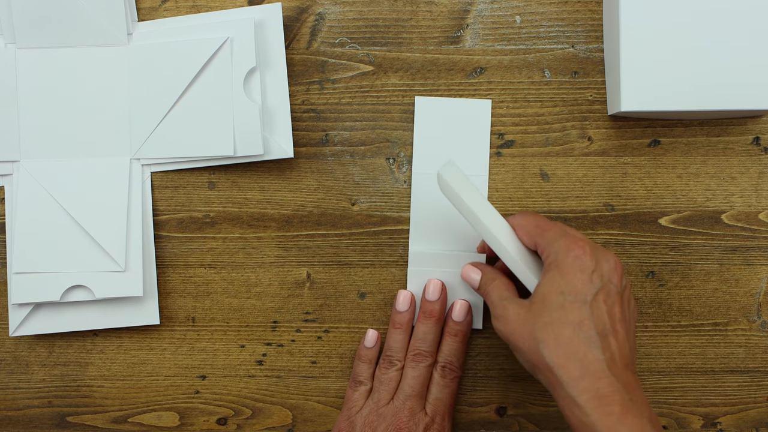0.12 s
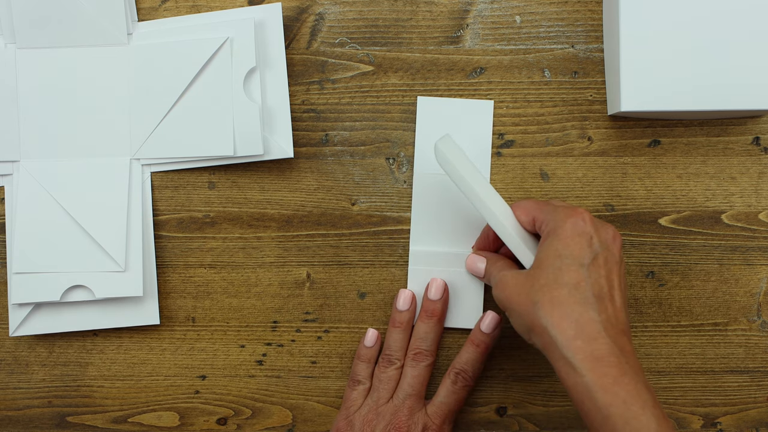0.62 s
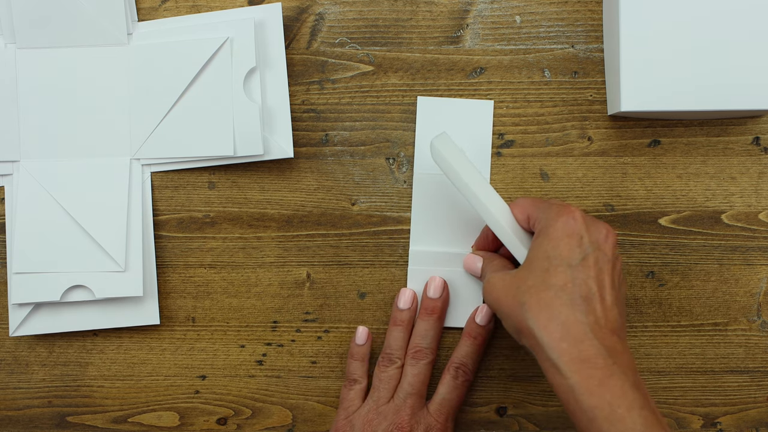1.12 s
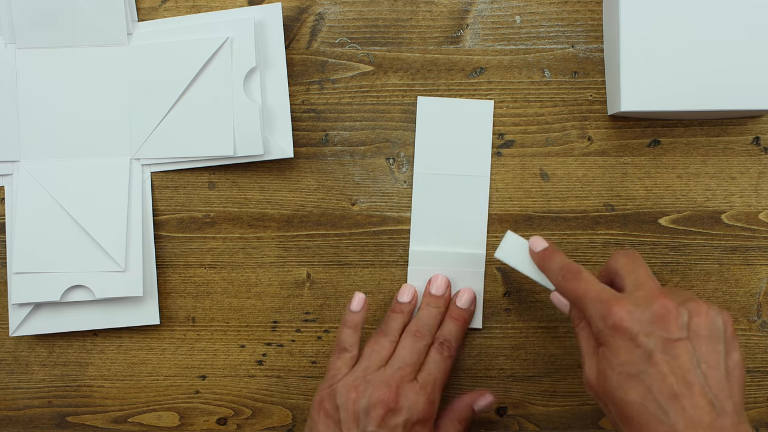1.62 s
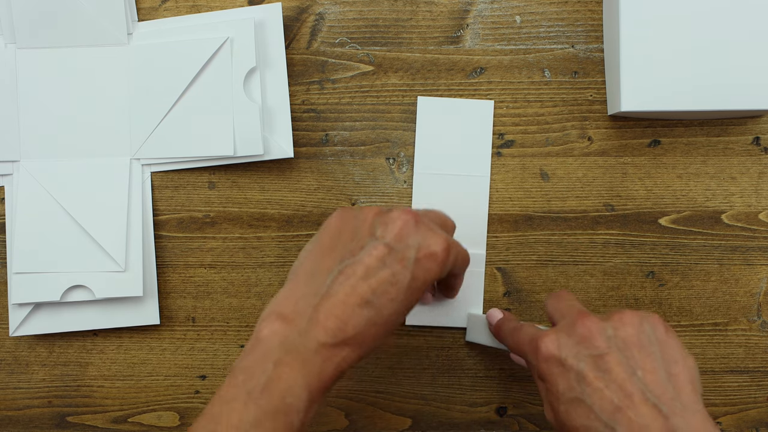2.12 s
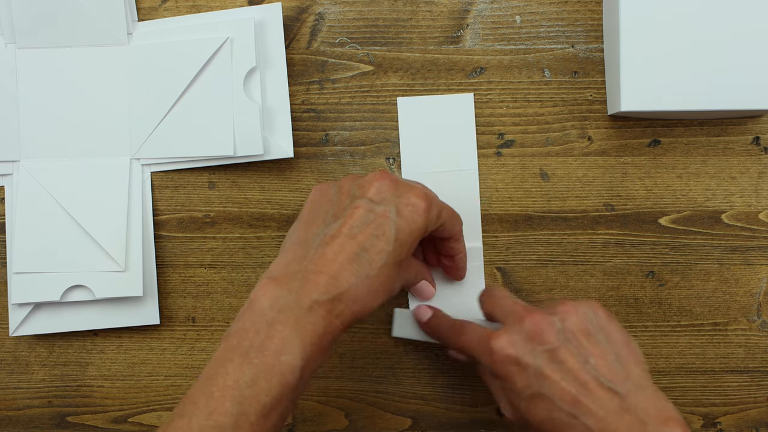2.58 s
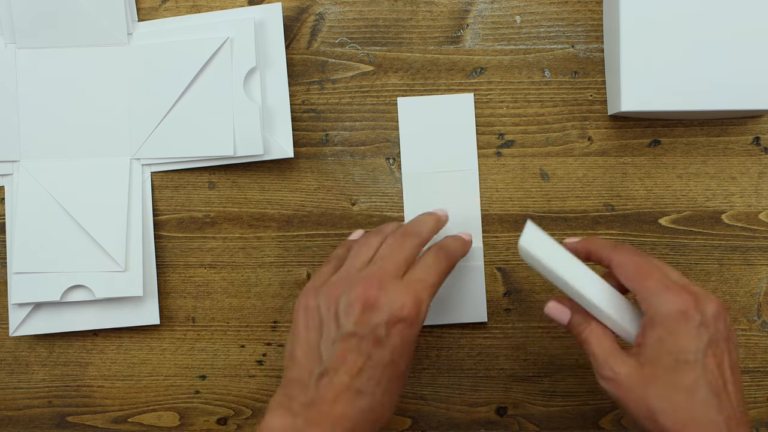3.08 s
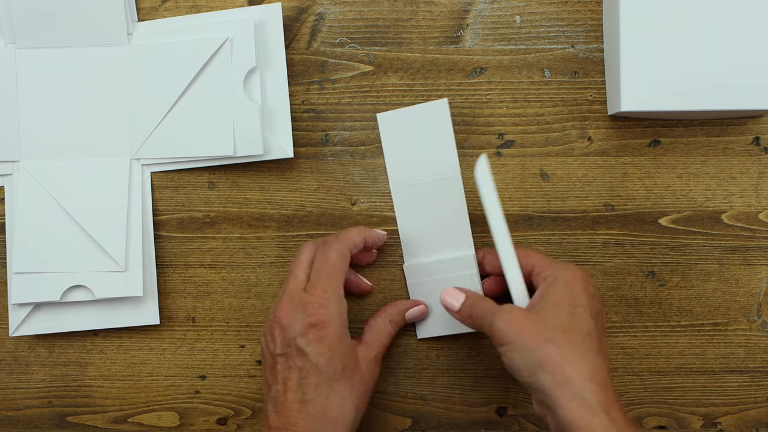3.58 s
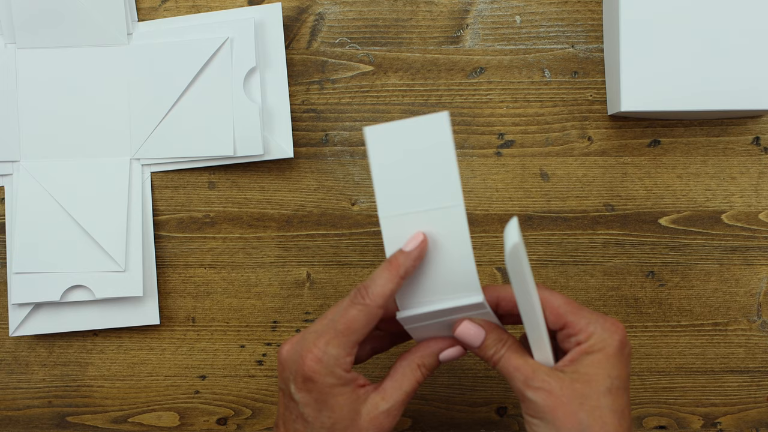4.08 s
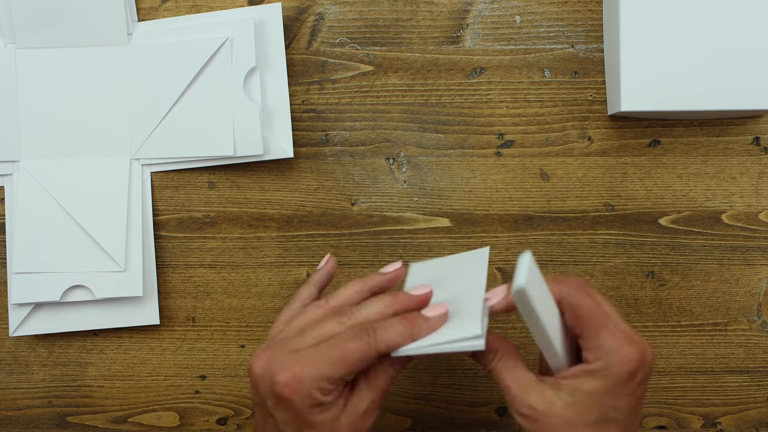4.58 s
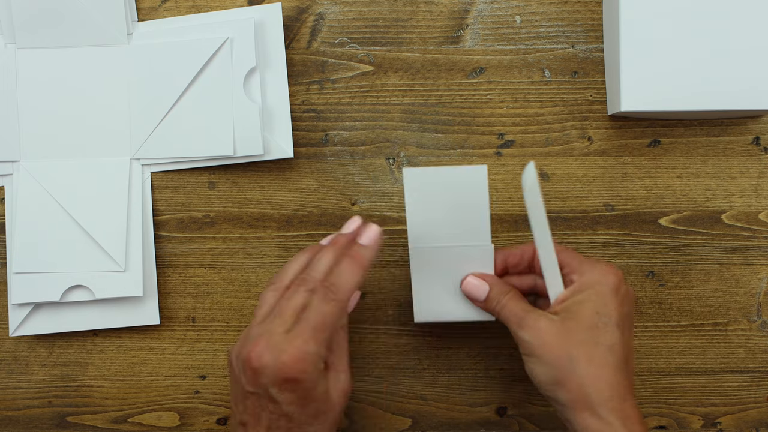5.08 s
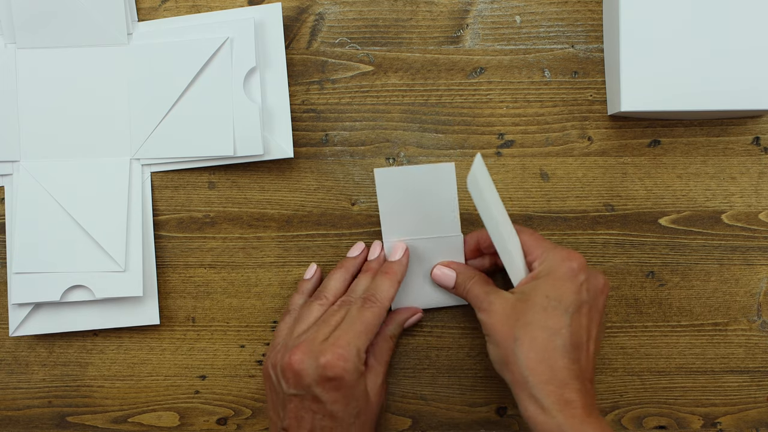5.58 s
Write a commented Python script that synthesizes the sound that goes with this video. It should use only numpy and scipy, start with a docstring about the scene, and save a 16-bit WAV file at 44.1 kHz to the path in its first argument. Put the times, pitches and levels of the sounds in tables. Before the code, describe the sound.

A close, mono sound of hands creasing a cardstock strip on a wooden table in a small quiet room. From 0 to 0.8 s, faint gritty rubs and small dry ticks, one clearer click near 0.75 s. It is nearly still until 1.35 s, when brief scratches and ticks return, with a crisp click near 1.7 s. Between 1.6 and 2.7 s, soft low thumps and light skims accompany sharper taps. The bone folder knocks the table at 2.6 s, then gives a rapid double clack at about 2.95 s, the second blow loudest and brightest, with a short woody ring. From 3.1 to 5 s, short papery scrapes, some with a slightly singing tone, and snappy ticks crowd together, strongest near 3.2, 3.9 and 4.7 s; small hollow taps sound near 4.7 s. Afterwards, sparse ticks and rubs remain until 5.6 s. Patchy hand rustle, faint hiss and a low wavering hum lie beneath.

```python
"""Hands fold and crease a strip of cardstock with a bone folder on a wooden table in a small quiet room.
Short gritty strokes (band-filtered friction noise, some with a singing resonance) and ticks of card edges
(filtered contact bursts) open the scene; the folder knocks the table near 2.6 s and, in two quick blows, just
before 3 s, ringing its modes. Strokes and ticks then go on, close together until about 5 s and sparser after.
Soft table thumps, a patchy murmur of hands, a faint hiss and a low wavering hum lie below."""
import sys
import numpy as np
from scipy import signal
from scipy.fft import rfft, irfft
from scipy.io import wavfile

SR = 44100
rng = np.random.default_rng(int(sys.argv[2]) if len(sys.argv) > 2 else 0)


def int16_out(signal):
    """Quantize to a 16-bit WAV file."""
    q = np.round(np.clip(np.atleast_2d(signal).T, -1, 1) * 32767)
    wavfile.write(sys.argv[1], SR, q.astype(np.int16))


def how_loud(loudness_db):
    """Turn decibels into a plain amplitude multiplier (0 dB gives 1, 20 dB gives 10)."""
    steps = np.asarray(loudness_db, float) / 20
    return 10 ** steps


N = 250664


def rms_one(x):
    """Normalization: equal mean power, so that a later gain sets the rms level."""
    return x / np.sqrt(np.mean(x ** 2) + 1e-20)


def band(x, low_hz, high_hz):
    """Band limitation: a Butterworth band-pass."""
    sos = signal.butter(2, [low_hz, min(high_hz, 0.45 * SR)], "band", fs=SR, output="sos")
    return signal.sosfilt(sos, x)


def resonance(x, hz, width_hz):
    """Forced resonance: two poles pass a band around hz, with gain 1 at its peak."""
    r = np.exp(-np.pi * width_hz / SR)
    poles = [1, -2 * r * np.cos(2 * np.pi * hz / SR), r * r]
    return signal.lfilter([(1 - r * r) / 2, 0, (r * r - 1) / 2], poles, x)


def ring(clicks, hz, t60):
    """Free damped vibration: a unit click starts a sine of height 1 that falls 60 dB in t60 seconds."""
    r = how_loud(-60 / (t60 * SR))
    w = 2 * np.pi * hz / SR
    return signal.lfilter([0, np.sin(w)], [1, -2 * r * np.cos(w), r * r], clicks + 1e-18)


def drift(rate_hz):
    """Random modulation: low-passed noise of rms 1, the faster the higher rate_hz."""
    r = np.exp(-2 * np.pi * rate_hz / SR)
    settled = signal.lfilter([1], [1, -2 * r, r * r], rng.standard_normal(N + SR))[SR:]
    return rms_one(settled)


def grit(per_s, spread_db, smooth):
    """Friction: dense fibre snaps of uneven size over smooth rubbing noise."""
    snaps = rng.random(N) < per_s / SR
    sizes = how_loud(spread_db * np.minimum(rng.exponential(1, N), 4))
    signs = rng.choice([-1, 1], N)
    return rms_one(snaps * sizes * signs) + smooth * rng.standard_normal(N)


def slides(edge_ms=11.0, release_ms=13.0, flutter_db=2.0):
    """Sliding friction: each stroke switches rubbing noise on; a light skim is brighter than a dull drag."""
    # strokes: start t/s, end t/s, level/dB, tilt/(dB per octave), table-top rumble level/dB
    strokes = [(0.023,.034,-61.5,-0.5,-78),(0.075,0.114,-69,2,-75),(0.109,0.141,-60.5,-1.5,-64),(0.143,0.217,-66,-1,-70),(0.208,0.225,-53,-2,-71),(.223,0.275,-56.5,-2,-62.5),(0.282,0.341,-61,-0.5,-65),(0.453,0.468,-61.5,-1.5,-73),(0.538,0.608,-61.5,2.5,-77),(.721,0.742,-64,-4.5,-68),(0.75,0.752,-49,-2.5,-65),
               (1.341,1.399,-63.5,-2.5,-61),(1.411,1.426,-50.5,-3.5,-63),(1.666,1.68,-57,-3,-64),(1.76,1.763,-53,-2,-56),(1.928,1.971,-60.5,2,-68),(2.081,2.114,-64.5,-4,-75),(2.154,2.211,-63,-6.5,-84),(2.254,2.332,-68,-4,-64.5),(2.333,2.451,-71.5,0,-60.5),(2.533,2.558,-64.5,3,-68),(2.605,2.634,-59.5,0,-73),(2.713,2.754,-54,-0.8,-55),
               (3.156,3.193,-48,0,-57),(3.305,3.367,-50,2,-67.5),(3.407,3.408,-51,-2,-74),(3.432,3.466,-57.5,-8,-50.5),(3.464,3.494,-47,2,-49),(3.529,3.581,-54.5,0.5,-69),(3.577,3.587,-45.5,-1.5,-54),(3.591,3.609,-58,-6,-63),(3.622,3.644,-57.5,-6,-64),(3.648,3.68,-66,-4,-61),(3.691,3.721,-60.5,-7,-64),(3.752,3.774,-68.5,-12,-72),(3.816,3.856,-53,-2.5,-54),(3.866,3.934,-55.5,-2.5,-60),
               (4.058,4.095,-61,2.5,-90),(4.138,4.154,-53.5,-2,-62),(4.161,4.191,-53,-1.5,-54),(4.19,4.251,-54.5,-0.5,-65),(4.261,4.311,-57.5,1,-66),(4.364,4.398,-66.5,2.5,-74),(4.435,4.462,-60.5,2,-73),(4.483,4.522,-56,-2,-63.5),(4.506,4.521,-53.5,2,-48),(4.537,4.57,-55,3.5,-81),(4.612,4.682,-56.5,1.5,-91),(4.681,4.778,-57.5,1,-74),(4.771,4.776,-55.5,-8,-45.5),(4.807,4.849,-54.5,1.5,-66),(4.978,5.012,-61.5,0.5,-79),
               (5.123,5.164,-56,4,-91),(5.398,5.461,-68,-8,-61),(5.575,5.583,-55,-4,-54),(5.592,5.626,-69,-9.5,-61)]
    # bands of card, paper fibres, skin: low f/Hz, high f/Hz, level at no tilt/dB
    slide_bands = [(2000, 4800, -3), (5050, 8050, -1.27), (9000, 13060, -2.5)]
    # resonances of the stiff strip: f/Hz, width/Hz, added level/dB
    card_modes = [(1200, 790, 0.5), (2900, 1400, -22), (6750, 1400, 6)]
    # the table top under a slide: low f/Hz, high f/Hz
    table_band_hz = (445, 1360)
    tilt_pivot_hz = 6300
    t, out = np.arange(N) / SR, np.zeros(N)
    friction = grit(per_s=2600, spread_db=2.5, smooth=0.69) * how_loud(flutter_db * drift(78))
    friction = friction + sum(how_loud(db) * resonance(friction, hz, width) for hz, width, db in card_modes)

    _, _, level_db, tilt_db, table_db = np.transpose(strokes)
    layers = [(*table_band_hz, table_db)]
    for low_hz, high_hz, db in slide_bands:
        octaves = np.log2(np.sqrt(low_hz * high_hz) / tilt_pivot_hz)
        layers.append((low_hz, high_hz, level_db + db + tilt_db * octaves))

    for low_hz, high_hz, levels_db in layers:
        gain = np.zeros(N)
        for (start, end, *_), db in zip(strokes, levels_db):
            i, j = max(int((start - 0.02) * SR), 0), int((end + 0.02) * SR)
            inside = np.minimum((t[i:j] - start) / edge_ms, (end - t[i:j]) / release_ms) * 1000
            gain[i:j] += how_loud(db) * np.clip(inside + 0.5, 0, 1)
        rubbing = band(band(friction, 0.89 * low_hz, 1.32 * high_hz), low_hz, high_hz)
        out += gain * rms_one(rubbing)
    return out


def singing(edge_ms=14.0):
    """Friction-driven resonance: rubbing noise excites one band of the bent strip, swelling in and out."""
    # sung bands: start t/s, end t/s, f/Hz, level/dB
    sung = [(0.078,0.298,2900,-69),(.207,0.219,6200,-43),(0.216,0.332,6100,-61.5),(0.563,.603,11500,-60),(.75,0.763,6200,-52.5),(1.418,1.428,6500,-46.5),(1.778,1.892,5200,-66.5),(1.924,2.054,10700,-65),(2.06,2.412,11500,-69),(2.164,2.205,3100,-63),(3.305,3.374,6850,-54),(3.423,3.51,1330,-57.5),(3.529,3.573,7600,-50.5),(3.62,3.782,2900,-66.5),(3.813,3.848,2740,-55),(3.882,3.928,1980,-67),(4.165,4.308,3600,-61.5),(4.51,4.519,2670,-38),(4.508,4.519,3190,-37.5),(4.482,4.556,2900,-59),(4.495,4.522,5940,-52),(4.674,4.678,2300,-47),(5.083,5.11,9000,-63),(5.123,5.162,4800,-58.5),(5.594,5.623,1300,-58)]
    t, rub = np.arange(N) / SR, grit(per_s=6600, spread_db=14.0, smooth=1.0)
    out = np.zeros(N)
    for start, end, hz, db in sung:
        i, j = int((start - 0.03) * SR), int((end + 0.03) * SR)
        edge_s = min(edge_ms / 1000, 0.5 * (end - start))
        inside = np.minimum(t[i:j] - start, end - t[i:j]) / edge_s
        width_hz = 0.11 * hz * (hz / 3000) ** 0.55   # relative width grows with pitch
        tone = resonance(resonance(rub[i:j], hz, width_hz), hz, 2 * width_hz)
        out[i:j] += how_loud(db) * np.clip(inside + 0.5, 0, 1) * rms_one(tone)
    return out


def tick_colour(contact, hz):
    """Resonant filtering: the card's own note over a broad skirt, and the bright crack."""
    card = 0.86 * resonance(contact, hz, 3.1 * hz) + 1.06 * resonance(contact, hz, 0.23 * hz)
    return band(card, 340, 2.54 * hz), band(contact, 4360, 10640)


def modes(table, at, level_db, reach_hz, scatter_db, damping):
    """Modal superposition: each blow strikes all modes by chance strengths, weakly those above reach_hz."""
    out, chance = np.zeros(N), rng.normal(0, 1, (len(at), len(table)))
    for k, (hz, mode_db, t60) in enumerate(table):
        reached = (-1) ** k / (1 + (hz / reach_hz) ** 4)
        clicks = np.zeros(N)
        clicks[at] = how_loud(level_db + mode_db + scatter_db * chance[:, k]) * reached
        out += ring(clicks, hz, t60 * damping)
    return out


def ticks(size=1500):
    """Impact: a brief ragged contact sounds card and crack, modes ring on; returns near sound and wall feed."""
    # card edges and nails: t/s, card peak level/dB, card f/Hz, crack peak level/dB, table knock level/dB
    card_ticks = [(.212,-39,1380,-35,-72),(.424,-47,3000,-42.5,-79),(0.456,-53,2000,-43,-72),(.613,-48,2550,-44,-68),(.724,-48,2520,-47.5,-74),(.746,-34.5,1390,-41,-62),(.753,-41,2920,-40,-71),(.881,-48,2560,-49,-81),(1.357,-45,1330,-56,-74),(1.374,-37,1400,-33,-52),(1.418,-43,3830,-51,-83),(1.62,-47,520,-47.5,-50.5),(1.679,-33,1490,-29.5,-62.5),(1.761,-43.5,1430,-37,-63),(2.146,-35.5,3000,-51.5,-61),(2.343,-31,2330,-62,-53),(2.509,-46,775,-42,-39),(2.57,-43,1800,-58,-80),(2.9178,-57,600,-63,-50.5),
                  (3.139,-60,600,-60,-63),(3.165,-27,2030,-32.5,-65),(3.278,-38.5,3020,-36.5,-71),(3.306,-52,4840,-35.5,-74),(3.402,-41,4000,-36,-79),(3.428,-39,1200,-56,-47),(3.53,-39,3800,-45,-72),(3.621,-45,2900,-52,-62),(3.665,-37,2900,-41,-72),(3.692,-40.5,1510,-57,-80),(3.755,-43,2920,-50,-63),(3.829,-35,2740,-44,-59),(3.88,-27.5,1720,-27,-52.5),(3.919,-37,2530,-50,-71),(3.951,-46,795,-51,-54),(3.996,-55,790,-45,-55),
                  (4.117,-48,2550,-61,-76),(4.141,-47,930,-43,-47.5),(4.51,-49,925,-41,-53.5),(4.5117,-36,2740,-43,-72),(4.5157,-34.5,3200,-40,-66),(4.651,-31.5,3000,-38,-82),(4.669,-27,2660,-26.5,-57),(4.699,-45,2590,-47,-87),(4.772,-33,1280,-27.5,-69),(4.835,-43,1310,-34,-77),(4.976,-50,4420,-73.5,-73),(5.054,-36,1200,-33,-59.5),(5.116,-41.5,966,-51,-62),(5.332,-44,1000,-40.5,-67),(5.404,-45,1340,-44,-67),(5.573,-46,900,-58,-68)]
    # the folder on the table top: the same five columns, then contact decay time/ms
    folder_knocks = [(2.62,-15.5,1167,-54,-33,4.2),(2.952,-15,1200,-30,-28.5,4),(2.9591,-5.5,2220,-17,-28.5,4.8)]
    # table top modes: f/Hz, relative level/dB, t60 before the damping factor/s
    table_modes = [(181, -19, 0.049), (258, -9.5, 0.094), (332, -5.5, 0.083), (404, -0.5, 0.057),
                   (506, 1, 0.083), (600, -5.5, 0.05), (590, -8.5, 0.032), (743, -11.5, 0.15),
                   (893, -2.5, 0.15), (1040, 1.5, 0.055), (1220, 0.5, 0.052), (1320, 7.5, 0.045),
                   (2040, 10.5, 0.054)]
    # modes of the air pocket in the folded strip: f/Hz, relative level/dB, t60 before the damping factor/s
    pocket_modes = [(377, 0, .17), (450, -6, .04), (620, -5, .045), (199, -5, .066)]
    # taps on the pocket: t/s, level before the mode levels/dB
    pocket_taps = [(4.669, -51), (4.772, -38)]
    tick_contact_ms = 2.25
    near, far, t = np.zeros(N + size), np.zeros(N + size), np.arange(size) / SR
    blows = [(*row, tick_contact_ms) for row in card_ticks] + folder_knocks
    noise = rng.standard_normal((len(blows), size))
    noise[:, 0] = 4.35   # the first touch is the hardest
    for (s, peak_db, hz, crack_db, _, contact_ms), draw in zip(blows, noise):
        contact = draw * np.exp(-t * 1000 / contact_ms)
        card, crack = tick_colour(contact, hz)
        card = how_loud(peak_db) * card / abs(card).max()
        crack = crack * np.exp(-t * 400)
        crack = how_loud(crack_db) * crack / abs(crack).max()
        # all directions together: the same energy, an even colour
        even_card, even_crack = tick_colour(1.0 * (t == 0), hz)
        i = round(s * SR)
        near[i:i + size] += card + crack
        far[i:i + size] += rms_one(even_card) * card.std() + rms_one(even_crack) * crack.std()

    rows, taps = np.array(blows), np.array(pocket_taps)
    blow_at = np.round(rows[:, 0] * SR).astype(int)
    tap_at = np.round(taps[:, 0] * SR).astype(int)
    wood = modes(table_modes, blow_at, rows[:, 4], reach_hz=rows[:, 2], scatter_db=4.5, damping=0.73)
    pocket = modes(pocket_modes, tap_at, taps[:, 1], reach_hz=3000, scatter_db=1.2, damping=1.1)
    return near[:N] + wood + pocket, far[:N] + wood + 0.31 * pocket


def thumps(cycles=3.8):
    """Damped oscillation: a soft push makes the whole table sway for a few cycles."""
    # weight landing on the table: t/s, peak level/dB, f/Hz
    landings = [(1.619, -58, 111), (1.757, -57.5, 94), (2.147, -57, 81.5), (2.273, -55, 158),
                (2.431, -51.5, 130), (2.51, -60, 55), (2.619, -53.5, 65), (2.715, -63, 45),
                (2.954, -58, 100), (3.43, -75, 150), (3.879, -52, 170), (4.772, -58, 109)]
    out, t = np.zeros(N + SR), np.arange(SR // 4) / SR
    for s, peak_db, hz in landings:
        swell = t * hz * np.exp(-t * hz * 7 / cycles)
        sway = swell * np.sin(2 * np.pi * hz * t)
        i = round(s * SR)
        out[i:i + len(t)] += how_loud(peak_db) * sway / abs(sway).max()
    return out[:N]


def hands():
    """Contact noise: palms and sleeves rub the wood, as three noise bands of slowly changing level."""
    # hands resting and shifting: t/s, mean murmur level/dB, mean dry hiss level/dB
    contacts = [(0,-64,-67.5),(.62,-66,-66),(.81,-73,-72),(1.68,-70.5,-68),(1.88,-66,-62),(2.06,-67,-62.5),(2.26,-63,-64.5),(2.53,-62,-64),(2.7,-58,-62.5),(3.01,-67.5,-62.5),(3.11,-57,-64),(3.26,-64.5,-62.5),(3.51,-61,-71),(3.95,-68.5,-63),(4.26,-70.5,-76),(4.49,-77,-58.5),(4.7,-70,-59),(4.82,-72.5,-71.5),(5.16,-71,-68.5),(5.38,-66,-68.5),(5.68,-60,-64.5)]
    s, *levels = np.transpose(contacts)
    low_db, high_db = [np.interp(np.arange(N) / SR, s, level) for level in levels]
    rumble = rms_one(band(rng.standard_normal(N), 70, 250))
    rumble = rumble * how_loud(low_db - 7.5 + 4.0 * drift(10))   # the deep rumble follows the murmur
    murmur = rms_one(band(rng.standard_normal(N), 220, 1390)) * how_loud(low_db + 0.81 * drift(35))
    dry_rub = grit(per_s=2700, spread_db=3.0, smooth=1.1)
    hiss = rms_one(band(dry_rub, 1630, 10800)) * how_loud(high_db + 1.9 * drift(3.3))
    return rumble + murmur + hiss


def room(x, gap_ms=6.3):
    """Reverberation: convolution with dense noise after a short gap, each band decaying at its own rate."""
    # bands of the reverberant tail: f/Hz, t60/s, level/dB
    tail_bands = [(267, 0.24, -2.5), (600, 0.11, -7), (1400, 0.33, -3.5), (3280, 0.17, -5),
                  (7100, 0.35, -7.5), (12100, 0.19, -19)]
    t = np.arange(SR // 2) / SR
    tail = 0
    for hz, t60, db in tail_bands:
        part = band(rng.standard_normal(len(t)), hz / 2.27, hz * 1.84)
        part = part * how_loud(-60 * t / t60) * (t > gap_ms / 1000)
        share = np.sqrt(hz * (1.5 - 1 / 1.095) * 2 / SR)   # amplitude weight, growing with the band's pitch
        tail = tail + how_loud(db) * share * part / np.sqrt(np.sum(part ** 2))
    return signal.fftconvolve(x, tail)[:N]


def coloured(spectrum):
    """Spectral shaping: steady noise of rms 1, its spectrum interpolated over log frequency."""
    hz = np.maximum(np.arange(N // 2 + 1) * SR / N, 1)
    points = np.array(spectrum)
    level_db = np.interp(np.log(hz), np.log(points[:, 0]), points[:, 1])
    return rms_one(irfft(rfft(rng.standard_normal(N)) * how_loud(level_db), N))


def background():
    """Stationary noise and amplitude modulation: room and microphone hiss, and a hum wavering in level."""
    # hum partials: f/Hz, peak level before wavering/dB
    hum_partials = [(58, -73.5), (120, -82)]
    # hiss spectrum: f/Hz, relative spectral density level/dB
    hiss_spectrum = [(20, -32), (35, -3.5), (60, -11), (100, -5.5), (150, -3.5), (300, -3), (450, -1.5),
                     (750, -14.5), (1600, -17), (4000, -22), (9000, -39), (13000, -20), (16000, -28)]
    t = np.arange(N) / SR
    hum = sum(how_loud(db + 1.5 * drift(9.6)) * np.sin(2 * np.pi * hz * t) for hz, db in hum_partials)
    return how_loud(-67.5) * coloured(hiss_spectrum) + hum


def scene():
    """Linear superposition: everything on the table, its reflections, and the quiet room."""
    near, far = ticks()
    rubs = slides() + singing()
    reflections = room(far + 0.57 * rubs)
    return (near + rubs + reflections + thumps() + hands() + background())[None]


def top_cut(x):
    """Nothing passes above the cut-off."""
    return signal.sosfilt(signal.butter(12, 16060, fs=SR, output="sos"), x)


def record(dry):
    """Transducer response: a small microphone lifts the treble and loses the deepest bass; the top is cut."""
    # presence bump: f/Hz, width/Hz, added level/dB
    presence = [(11500, 790, -9.5)]
    bright = dry + sum(how_loud(db) * resonance(dry, hz, width) for hz, width, db in presence)
    bright = signal.sosfilt(signal.butter(2, 30, "high", fs=SR, output="sos"), bright)
    finished = signal.sosfilt(signal.cheby2(10, 50, 16500, fs=SR, output="sos"), bright)
    return top_cut(finished)


dry = scene()
out = record(dry)
int16_out(out)
```